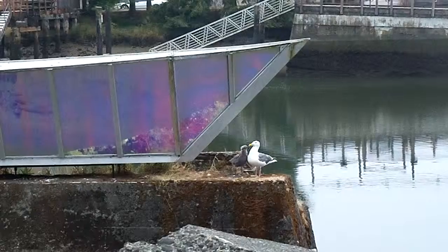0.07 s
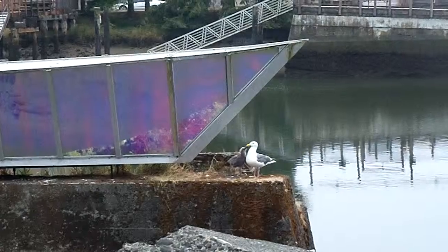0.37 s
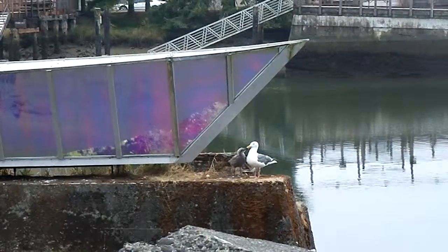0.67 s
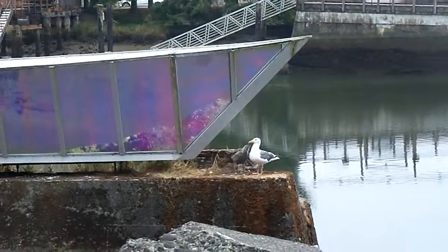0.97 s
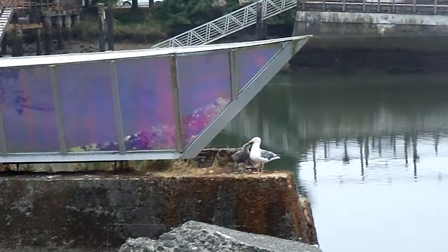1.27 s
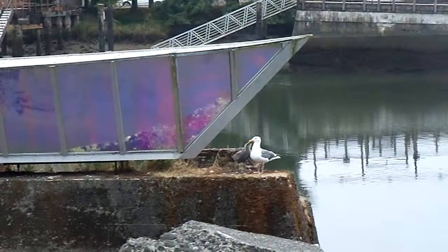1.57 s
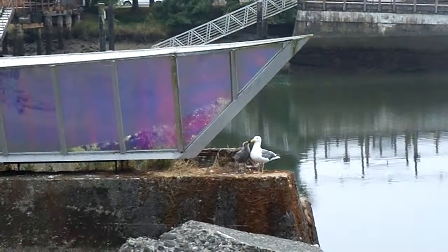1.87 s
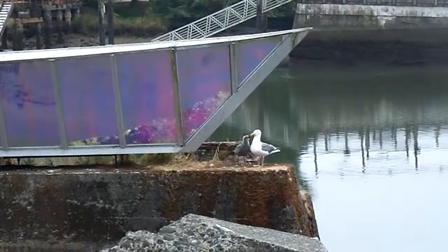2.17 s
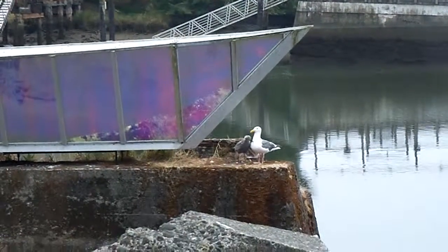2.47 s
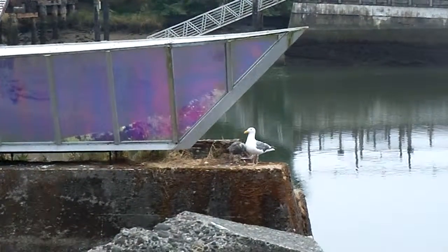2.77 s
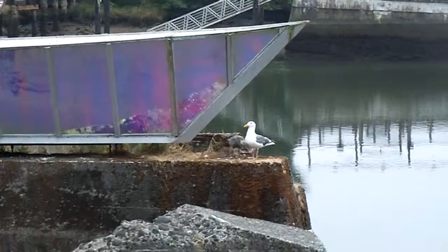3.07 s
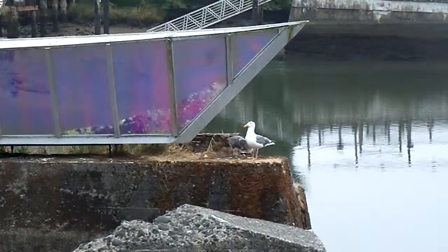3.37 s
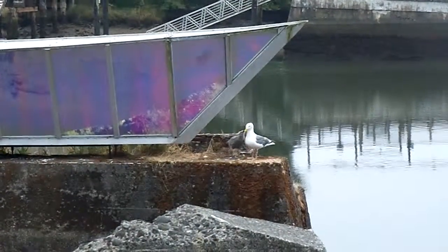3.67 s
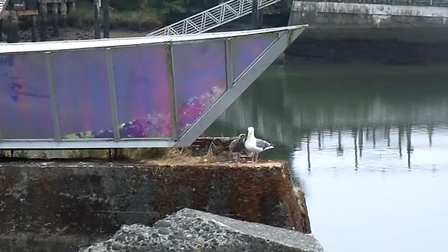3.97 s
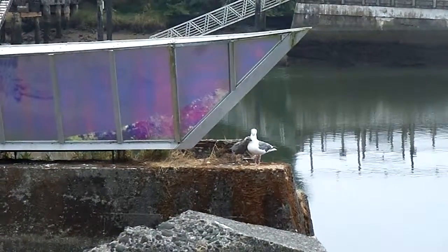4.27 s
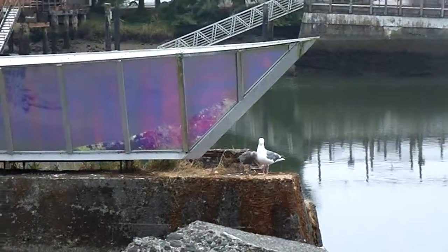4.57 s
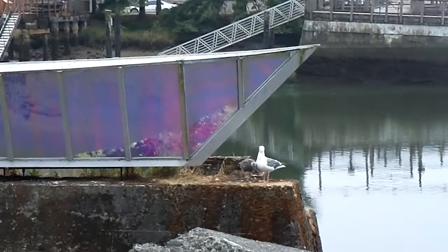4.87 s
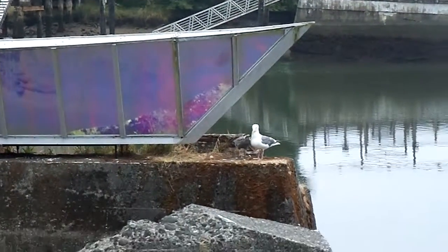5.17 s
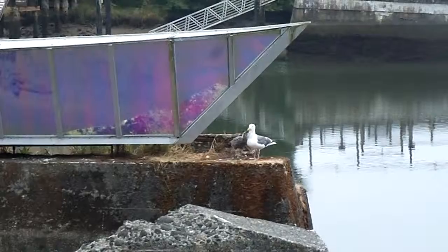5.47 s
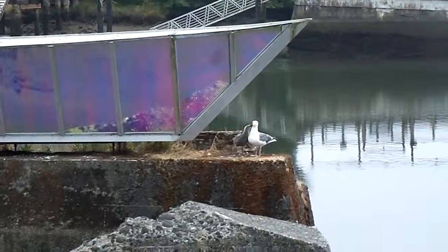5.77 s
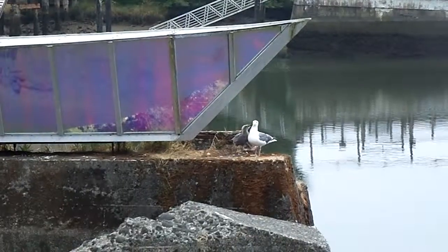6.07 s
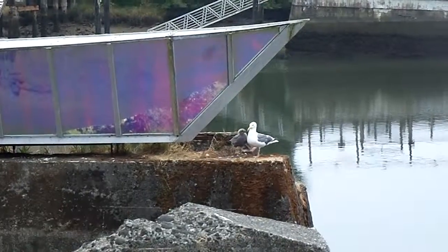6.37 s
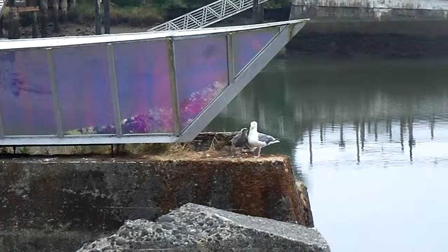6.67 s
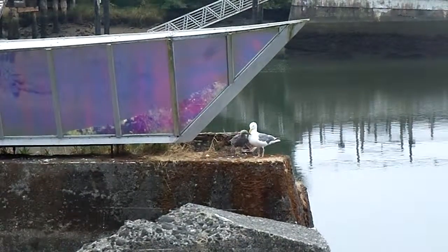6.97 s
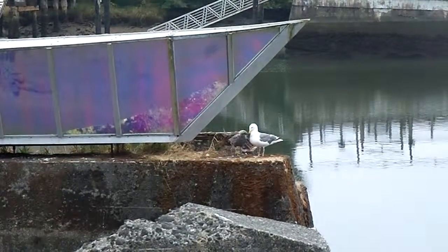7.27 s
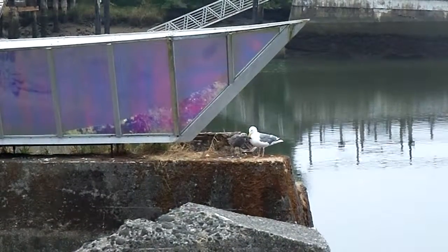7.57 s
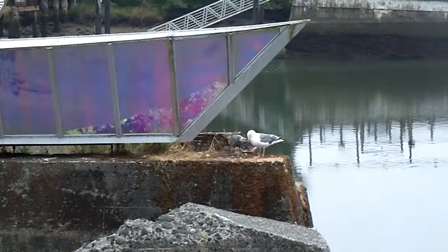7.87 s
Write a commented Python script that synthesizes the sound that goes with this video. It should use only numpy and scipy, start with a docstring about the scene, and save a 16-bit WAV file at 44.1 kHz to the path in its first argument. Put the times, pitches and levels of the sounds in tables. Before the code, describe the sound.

A gull chick whistles thinly across a river over distant traffic and engines, while a gust of wind buffets the microphone.

```python
"""A gull chick begs with thin, arched whistles on an old river pier, heard from across the water.
Town traffic roars behind it and engines drone; the whole background fades, ducks and comes back up.
A faint, broken whistle comes before the first call, and both echo softly off quay walls and pilings.
A gust buffets the microphone and overloads it, so that it snaps. Tiny ticks sound in the lull."""
import sys
import numpy as np
from scipy import signal
from scipy.fft import rfft, irfft, next_fast_len
from scipy.io import wavfile

SR = 44100
rng = np.random.default_rng(int(sys.argv[2]) if len(sys.argv) > 2 else 0)


def master_out(mix):
    """Clip the mix to full scale and print it as 16-bit PCM to the path in sys.argv[1]."""
    frames = np.transpose(np.atleast_2d(mix))
    ceiling = np.clip(frames, -1, 1)
    pcm = np.round(ceiling * 32767).astype(np.int16)
    wavfile.write(sys.argv[1], SR, pcm)


N = 349272
TIME = np.arange(N) / SR
CLIP_LEVEL = 0.355  # the largest signal the microphone can pass

# How loud the background is: it fades, ducks under the gust, then comes back up.
# Each row: time in seconds, traffic roar in dB, engine drone in dB.
BACKGROUND_LEVELS = [(.1, -21, -26), (.25, -26, -24.5), (.55, -31, -25.5), (1.1, -32.5, -29),
                     (1.75, -37.5, -34), (3.1, -49, -46.5), (3.9, -50, -46.5), (4.82, -55, -53),
                     (4.94, -48, -45), (5.1, -44.5, -39.5), (5.55, -38, -38.5), (6.4, -34.5, -31.5),
                     (7.85, -29, -29)]


def undb(db):
    """Turn decibels into a factor to multiply by."""
    return 10 ** (np.asarray(db) / 20)


def curve(rows):
    """Join a table's rows with straight lines: one curve for each column after the time."""
    times, *columns = np.transpose(rows)
    return [np.interp(TIME, times, column) for column in columns]


def bell(at, half_width):
    """A smooth rise and fall that reaches one at the given time."""
    return np.exp(-.5 * ((TIME - at) / half_width) ** 2)


def envelope(start, length, attack, release):
    """Swell, hold and fade; all times are in seconds."""
    return np.clip(np.minimum((TIME - start) / attack, (start + length - TIME) / release), 0, 1)


def shaped(gain_at):
    """Noise of strength one, with each frequency weighted by gain_at(hz)."""
    size = next_fast_len(N, True)
    hz = np.maximum(np.fft.rfftfreq(size, 1 / SR), 1)
    x = irfft(rfft(rng.standard_normal(size)) * gain_at(hz), size)[:N]
    return x / x.std()


def noise(colour):
    """Noise with a given colour: its balance of low and high frequencies."""
    hz, db = np.transpose(colour)
    return shaped(lambda f: undb(np.interp(np.log(f), np.log(hz), db)))


def resonance(hz, half_width_hz):
    """Noise that rings around one pitch."""
    return shaped(lambda f: 1 / (1 + ((f - hz) / half_width_hz) ** 2))


def wobble(rate):
    """A smooth random wobble that changes about rate times a second."""
    return shaped(lambda f: np.exp(-(f / rate) ** 2))


def trembling(hz, jitter, rate=105):
    """The phase of a tone whose pitch trembles by the fraction jitter."""
    return 2 * np.pi * np.cumsum(hz * (1 + jitter * wobble(rate))) / SR


def traffic(roar_gain_db=2, tyre_gain_db=5.5, air_gain_db=5.0, flicker_db=0.53):
    """Far roads: a dull roar that passing vehicles colour in turn, tyre hiss and thin air noise."""
    # How loud the hiss is. Each row: time in seconds, tyres in dB, air in dB.
    hiss_levels = [(.08, -49, -55), (.4, -52, -60.5), (1.88, -53.5, -62), (2.3, -67, -73), (3.05, -71, -82),
                   (3.6, -65.5, -79), (4.85, -75, -86), (5.08, -61.5, -76), (5.28, -60, -73.5),
                   (5.35, -55, -70), (6.48, -48.5, -63.5), (7.1, -51.5, -63), (7.9, -53, -64)]
    # Resonances of passing vehicles. Each row: pitch in Hz, half-width in Hz, loudest moment in seconds,
    # half-width in seconds, level in dB against the roar curve.
    vehicles = [(296.5, 22, 0.33, 0.37, -4.5), (471, 74, 0.32, 3.7, -3), (735, 100, 0.33, 0.33, -6),
                (710, 150, 0.85, 0.64, -2.5), (1354, 120, 0.32, 0.18, -9.5), (2560, 280, 0.14, 1, -16),
                (3180, 99, 0.36, 0.29, -22), (780, 41, 5.88, .25, -7.5), (1080, 70, 5.65, 0.45, -12.5),
                (850, 180, 3.4, 0.4, -0.5), (147, 7.2, 3.93, 0.16, 1.5), (441, 14, 5, 1.1, -21),
                (1120, 580, 6.39, 0.47, -0.5)]
    # The colours of the three noises. Each row: frequency in Hz, relative level in dB.
    roar_colour = [(30, -9), (70, 2), (110, 3), (250, -1), (360, 0.5), (430, 2), (600, 0.5), (900, 0.5),
                   (1250, -3), (1800, -9), (2600, -16), (3400, -22.5), (6000, -28.5), (14000, -46)]
    tyre_colour = [(800, 7), (2500, 8), (4200, 6.5), (5500, 0), (7500, -3), (9500, -11.5), (14000, -27)]
    air_colour = [(4000, -18), (8000, -5), (10500, 1.5), (12500, 2), (14000, -4)]
    roar_db, _ = curve(BACKGROUND_LEVELS)
    tyre_db, air_db = curve(hiss_levels)
    passing = sum(resonance(hz, width_hz) * undb(db) * bell(at, width_s)
                  for hz, width_hz, at, width_s, db in vehicles)
    roar = (noise(roar_colour) * undb(roar_gain_db) + passing) * undb(roar_db)
    tyres = noise(tyre_colour) * undb(tyre_db + tyre_gain_db)
    flicker = undb(flicker_db * wobble(18))
    air = noise(air_colour) * undb(air_db + air_gain_db)
    return (roar + tyres) * flicker + air


def engines(hum_hz=72.1, drone_gain_db=-7.0, early_jitter=0.0063, late_jitter=0.019, throb_db=1.8):
    """Far engines: droning resonances over a deep hum that throbs at first and wavers in pitch later."""
    # The drone's resonances. Each row: pitch in Hz, half-width in Hz, early and late levels in dB.
    drone_tones = [(101, 9.5, -32, -9), (149.5, 7.9, 1.5, 1.5), (175.7, 13.4, -5, -4),
                   (199.3, 7.4, -2, -5.5), (262, 87, 1.5, -3.5), (290.2, 12.6, -3, -1)]
    # How loud the hum is. Each row: time in seconds, level in dB.
    hum_levels = [(.07, -25.5), (1.2, -30.5), (1.8, -38), (2.6, -46), (3.5, -63), (5.7, -54.5),
                  (6.3, -42.5), (7.2, -39), (7.65, -38.5), (7.84, -34)]
    _, drone_db = curve(BACKGROUND_LEVELS)
    hum_db, = curve(hum_levels)
    late, = curve([(1.8, 0.042), (3.3, 1)])  # slides from the early sound to the late one
    drone = sum(resonance(hz, width) * undb(early_db + (late_db - early_db) * late)
                for hz, width, early_db, late_db in drone_tones)
    jitter = early_jitter * (1 - late) + late_jitter * late
    hum = np.sqrt(2) * np.sin(trembling(hum_hz, jitter, rate=26))
    throb = throb_db * (1 - late) * wobble(6.2)
    return drone * undb(drone_db + drone_gain_db) + hum * undb(hum_db - throb)


def far_whistle(jitter=.008, shimmer_db=2.5, fade_s=.018):
    """A faint, unsteady whistle that breaks into short pieces on nearly one pitch."""
    # Each row: start in seconds, length in seconds, pitch in Hz, level in dB.
    pieces = [(.82, .048, 2955, -49), (.874, .056, 2965, -45.5), (.925, .06, 2955, -52.5),
              (1.108, .055, 2995, -48), (1.17, .12, 2985, -56)]
    pitch, = curve([(start + length / 2, hz) for start, length, hz, _ in pieces])
    strength = sum(undb(db) * envelope(start, length, fade_s, fade_s) for start, length, _, db in pieces)
    tone = np.sqrt(2) * np.sin(trembling(pitch, jitter))
    return tone * strength * undb(shimmer_db * wobble(50))


def gull_chick(gain_db=-.4, jitter=0.0034, rasp_jitter=.005, shimmer_db=1.6):
    """Thin begging whistles with a weaker octave above: each scoops up, arches and sags away."""
    # One list per call. Each row: time in seconds, pitch in Hz, level in dB, the octave's level in dB.
    calls = [
        [(1.3, 4250, -64, -80), (1.345, 4560, -57.5, -76), (1.4, 4500, -62, -75), (1.455, 4600, -57.5, -74),
         (1.51, 4510, -60, -75), (1.59, 4320, -63, -76)],
        [(2.3, 4250, -74, -80), (2.36, 4570, -73, -77.5), (2.44, 4510, -70, -80.5), (2.5, 4420, -73, -83)],
        [(4.175, 3900, -80, -84), (4.21, 4360, -80, -82), (4.24, 4440, -79, -87), (4.28, 4520, -76.5, -81),
         (4.335, 4440, -74.5, -83), (4.375, 4390, -75, -92)],
        [(5.14, 3700, -65, -85), (5.178, 3920, -63, -82), (5.194, 4980, -63, -69), (5.213, 5060, -58, -69),
         (5.235, 4990, -72, -76), (5.27, 4900, -59, -65), (5.294, 4820, -51.5, -62.5), (5.312, 4640, -56, -68),
         (5.36, 4510, -59, -73), (5.415, 4390, -55, -60.5), (5.455, 4190, -60, -66), (5.505, 3800, -65, -67)],
        [(6.075, 3600, -60, -78), (6.103, 3770, -46, -68), (6.12, 3900, -52, -73), (6.131, 4310, -46.5, -66),
         (6.152, 4410, -50.5, -64.5), (6.2, 4470, -46.5, -63), (6.257, 4445, -42.5, -72),
         (6.275, 4360, -46.5, -63.5), (6.345, 4220, -53, -78)],
        [(7.02, 3980, -53, -76), (7.052, 4510, -48.5, -68), (7.075, 4610, -50, -62), (7.105, 4610, -54, -63),
         (7.125, 4590, -46.5, -57), (7.15, 4575, -53, -62), (7.16, 4435, -48, -56), (7.2, 4410, -44.5, -60),
         (7.235, 4340, -58, -61), (7.258, 4290, -42.5, -67), (7.283, 4230, -44, -70), (7.305, 4170, -52, -69),
         (7.342, 3940, -50, -73)],
    ]
    rasp = rasp_jitter * (bell(5.3, .014) + bell(6.27, .014))  # the voice breaks roughly twice
    voice = 0
    for call in calls:
        hz, db, octave_db = curve(call)
        start, end = call[0][0], call[-1][0]
        phase = trembling(hz, jitter + rasp)
        tone = undb(db) * np.sin(phase) + undb(octave_db) * np.sin(2 * phase)
        voice = voice + tone * envelope(start, end - start, attack=.008, release=.02)
    return np.sqrt(2) * voice * undb(gain_db + shimmer_db * wobble(45))


def riverside_echo(sound, echo_db=-8.5, fade_s=0.95):
    """Quay walls and pilings scatter a soft tail behind a call; it falls by 60 dB in fade_s."""
    tail = rng.standard_normal(SR) * undb(-60 * TIME[:SR] / fade_s)
    echo = signal.fftconvolve(sound, tail / np.linalg.norm(tail))[:N]
    return sound + undb(echo_db) * echo


def wind(full_gust_db=-17, boom_growth=1.29, eddy_growth=1.75, churn_db=5.5):
    """Wind on the microphone: slow pressure swings, a boom, churning eddies and dull thuds."""
    # A light breeze and one long gust. Each row: time in seconds, level in dB.
    gust_levels = [(.07, -50), (1.81, -37.5), (1.91, -16.5), (2.07, -25.5), (2.24, -24), (2.45, -25),
                   (2.62, -22), (2.69, -32.5), (2.8, -28.5), (3.1, -32), (3.42, -42), (3.7, -38.5),
                   (3.88, -50), (4.14, -53), (4.2, -47), (4.68, -47), (4.76, -47.5), (5.4, -45.5),
                   (7.9, -44)]
    # Puffs of wind and dull blows. Each row: peak time in seconds, level in dB, half-width in seconds.
    puffs = [(1.92, -15, 0.0073), (1.964, -12.5, 0.0099), (2.006, -16.5, 0.012), (2.046, -14, 0.014),
             (2.132, -16, 0.01), (2.169, -17, 0.011), (2.334, -21.5, .006), (2.366, -22, .014),
             (2.435, -22, .006), (2.556, -25, 0.032), (2.605, -17, 0.008), (2.646, -23.5, .01),
             (2.722, -25.5, 0.013), (2.802, -26, 0.0048), (4.19, -41, .013), (4.255, -41, 0.024),
             (4.298, -42, .012), (4.405, -41, .01), (4.465, -43, .016), (4.55, -41.5, .012),
             (4.59, -43, .01), (4.682, -39, 0.013), (7.45, -36.5, 0.3)]
    buffets = [(1.916, -17.5, 0.0042), (1.926, -26, .002), (1.957, -14, 0.0025), (1.968, -16, 0.0031),
               (1.986, -19, 0.0034), (2.052, -19, .004), (2.129, -25, 0.0025), (2.17, -27, 0.0023),
               (2.183, -28.5, 0.0068), (2.327, -30, .002), (2.385, -25.5, .007), (2.397, -30, 0.0041),
               (2.523, -26, 0.012), (2.546, -26, .002), (2.605, -18, 0.0037), (2.617, -17.5, 0.0044),
               (2.65, -28, .008), (2.718, -33.5, .004), (2.806, -32.5, 0.0026), (2.835, -35, .002),
               (2.916, -33.5, .004), (2.977, -36, .003)]
    # The colours of the wind's noises. Each row: frequency in Hz, relative level in dB.
    pressure_colour = [(8, -4), (22, -2.5), (45, -1.5), (70, -11.5), (120, -21), (200, -24), (500, -55),
                       (2000, -92)]
    eddy_colour = [(50, -16), (120, -4.5), (190, -1.5), (330, -8.5), (550, -20), (1000, -30), (2000, -42),
                   (5000, -58), (14000, -73)]
    buffet_colour = [(100, 5), (220, 10), (480, 10), (750, 2), (1100, -4), (1700, -14), (2500, -26),
                     (5000, -41), (14000, -60)]
    gust_db, = curve(gust_levels)
    puff_power = sum((undb(db) * bell(at, width)) ** 2 for at, db, width in puffs)
    wind_db = 10 * np.log10(undb(gust_db) ** 2 + puff_power)
    pressure = noise(pressure_colour) * undb(wind_db - .5)
    # A light breeze only sways the microphone's membrane; stronger wind reaches higher frequencies.
    force_db = wind_db - full_gust_db
    boom_db = full_gust_db + boom_growth * force_db - .5
    eddy_db = full_gust_db + eddy_growth * force_db - 3
    boom = resonance(hz=74.6, half_width_hz=65) * undb(boom_db)
    eddies = noise(eddy_colour) * undb(eddy_db + churn_db * np.tanh(wobble(64)))
    thuds = noise(buffet_colour) * sum(undb(db) * bell(at, width) for at, db, width in buffets)
    return pressure + boom + eddies + thuds


def overload_snaps(sound, click_width_s=.000028):
    """The hardest blows of wind make the microphone snap: a click and a cycle or two of ringing."""
    # Each row: time in seconds, ring pitch in Hz, ring level in dB, half-width in seconds, click in dB.
    snaps = [(1.913, 1010, -21, 0.00059, -40), (1.918, 1800, -19.5, 0.00056, -29),
             (1.926, 1500, -21, 0.00053, -40), (1.9583, 2100, -14.5, 0.00037, -33),
             (1.9602, 1550, -12, 0.00067, -40), (1.968, 1490, -18, .0006, -40),
             (1.97, 2960, -30, .00025, -35), (2.0505, 1290, -14, 0.00023, -18),
             (2.0543, 1380, -20.5, 0.00033, -37), (2.131, 1390, -24.5, 0.00047, -32),
             (2.384, 1500, -28.5, 0.00084, -45), (2.395, 1200, -26, .0006, -45),
             (2.606, 1250, -18, 0.0006, -33), (2.611, 1750, -19.5, 0.00038, -28),
             (2.6177, 2290, -18, 0.00029, -26), (2.622, 2800, -27, .0003, -33),
             (2.6535, 1280, -37, .0008, -45)]
    out = sound.copy()
    reach = SR // 100  # samples on each side of a snap
    t = np.arange(-reach, reach) / SR
    for at, hz, db, width, click_db in snaps:
        near = slice(int(at * SR) - reach, int(at * SR) + reach)
        blow = undb(db) * np.exp(-.5 * (t / width) ** 2)
        ring = blow * np.sin(2 * np.pi * (hz * t + rng.random()))
        click = undb(click_db) * np.exp(-.5 * (t / click_width_s) ** 2)
        room_left = 1 - np.tanh(blow / CLIP_LEVEL)  # the blow takes up part of the membrane's travel
        out[near] = out[near] * room_left + ring + click
    return out


def ticks():
    """A few tiny, bright ticks in the lull."""
    # Each row: time in seconds, level in dB, half-width in seconds.
    bursts = [(3.177, -67.5, .001), (3.54, -68, .003), (4.451, -69, .001)]
    strength = sum(undb(db) * bell(at, width) for at, db, width in bursts)
    return resonance(hz=11500, half_width_hz=2500) * strength


def scene():
    """The chick and the far whistle over the town, with wind at the microphone, in one channel."""
    background = traffic() + engines() + overload_snaps(wind()) + ticks()
    whistles = riverside_echo(gull_chick() + far_whistle())
    return (background + whistles)[None]


def record(dry):
    """The microphone opens abruptly, flattens the tallest peaks and cuts the highest treble."""
    start_s, fade_in_s, top_hz = 0.0674, 0.0033, 14000
    opened = dry * np.clip((TIME - start_s) / fade_in_s, 0, 1)
    clipped = opened / (1 + (opened / CLIP_LEVEL) ** 8) ** (1 / 8)
    treble_cut = signal.ellip(10, .2, 80, top_hz, fs=SR, output="sos")
    return signal.sosfilt(treble_cut, clipped)


dry = scene()
out = record(dry)
master_out(out)
```